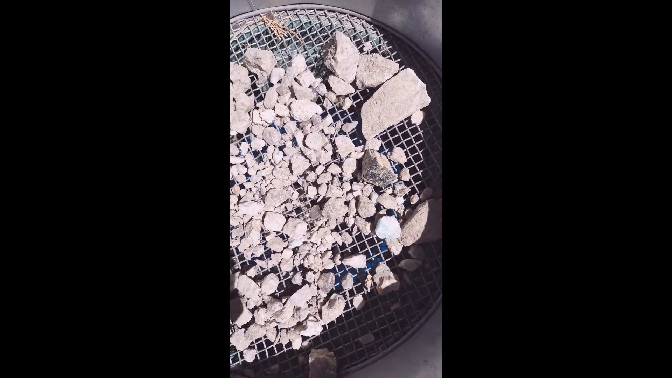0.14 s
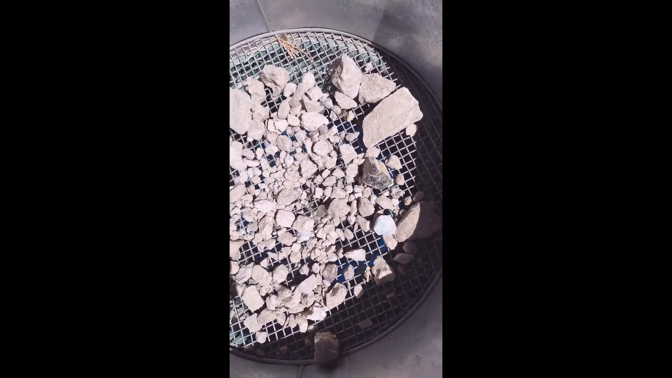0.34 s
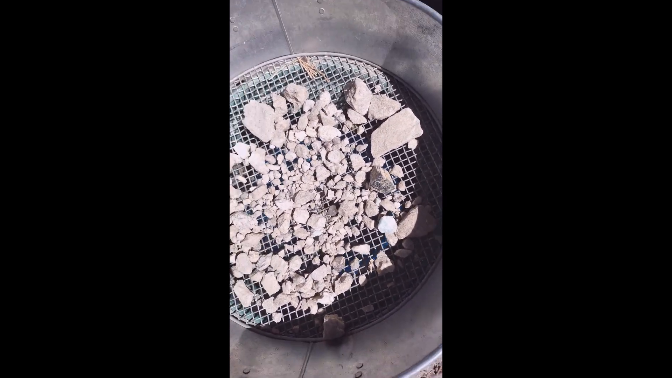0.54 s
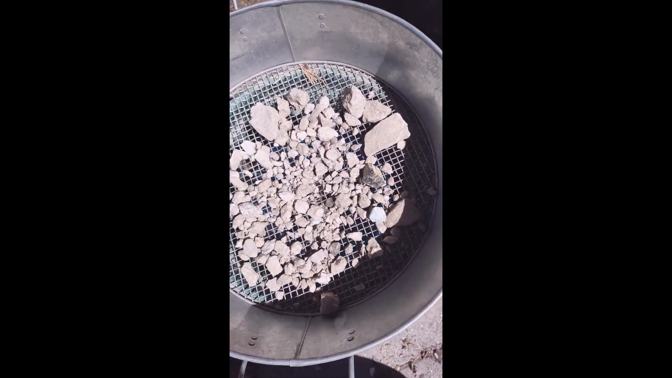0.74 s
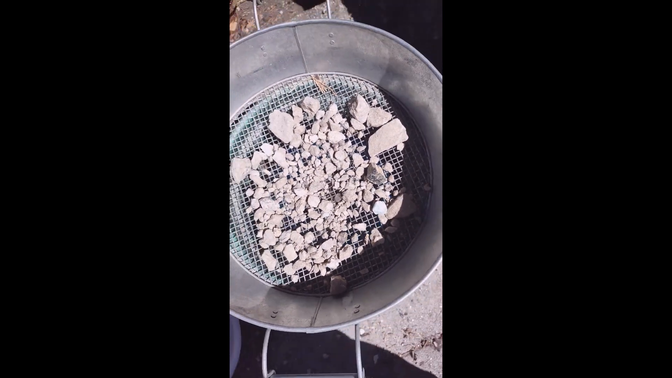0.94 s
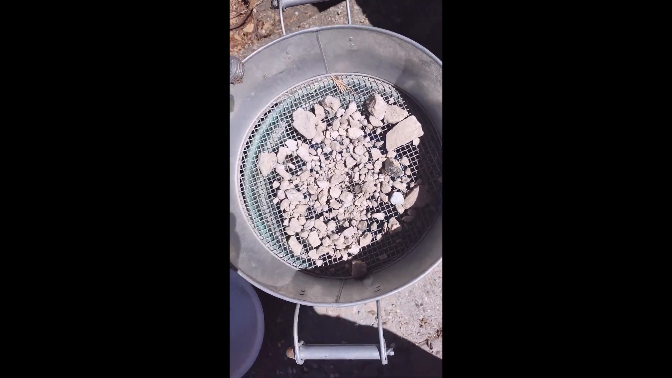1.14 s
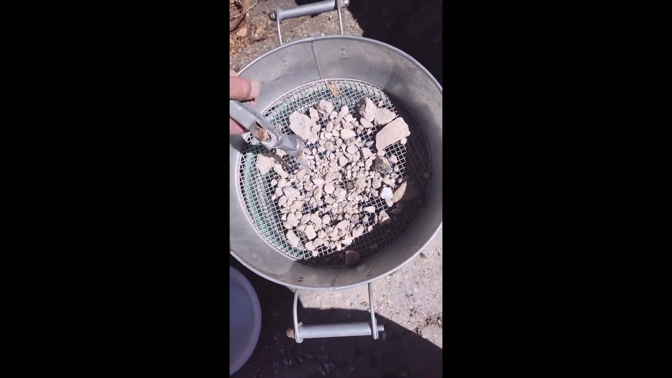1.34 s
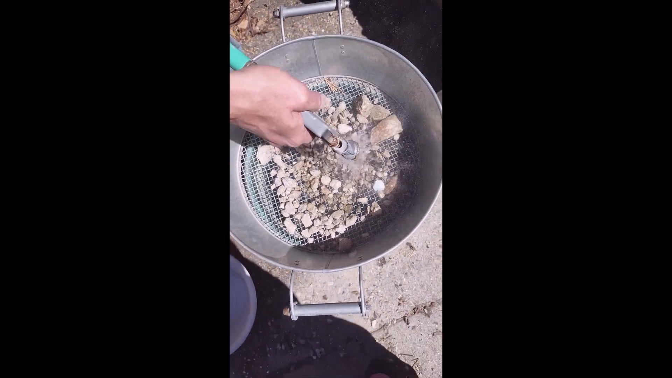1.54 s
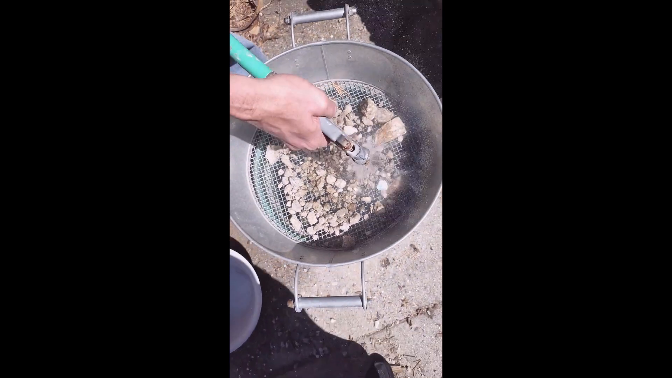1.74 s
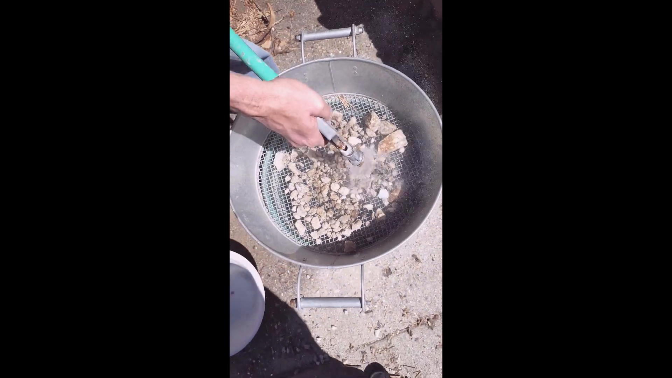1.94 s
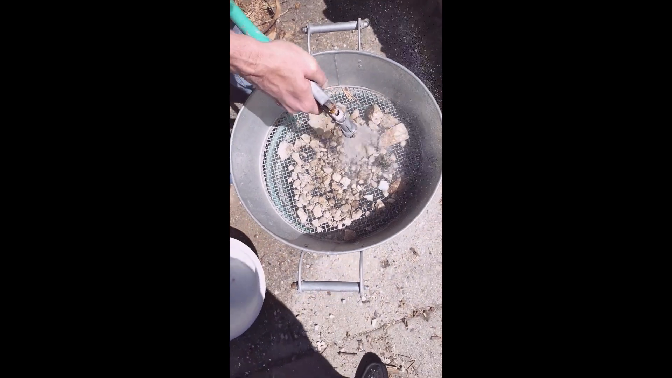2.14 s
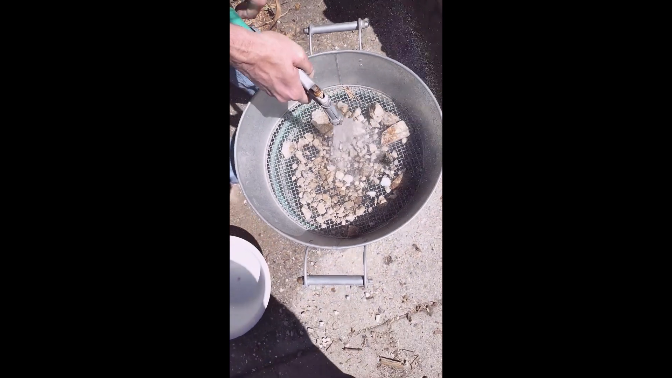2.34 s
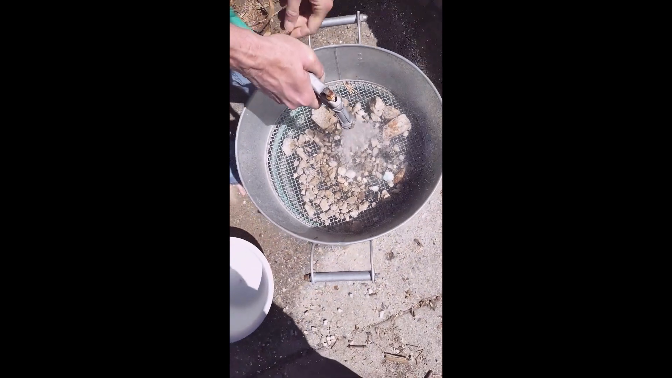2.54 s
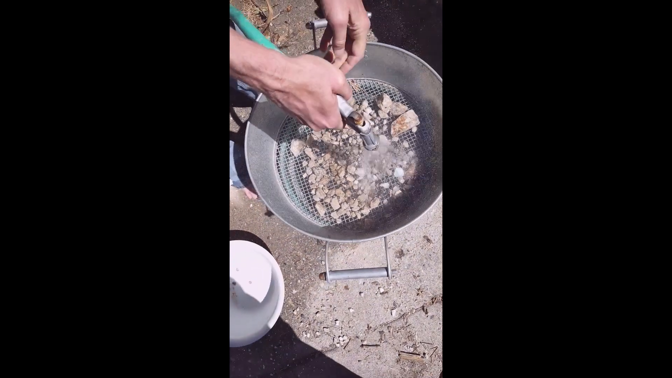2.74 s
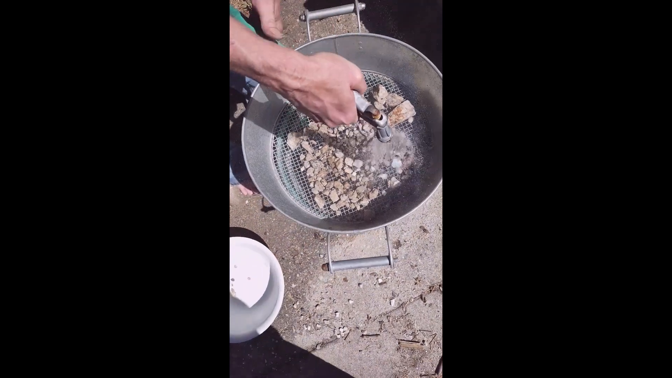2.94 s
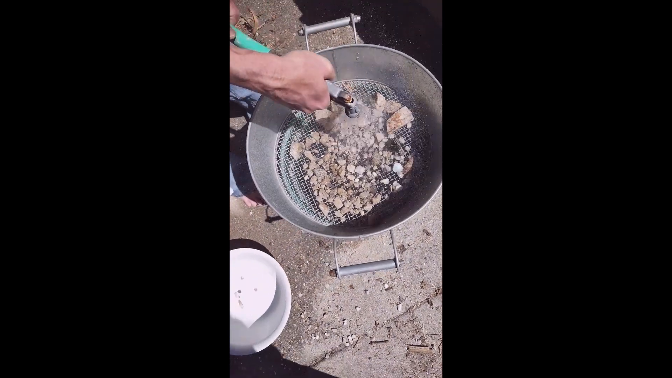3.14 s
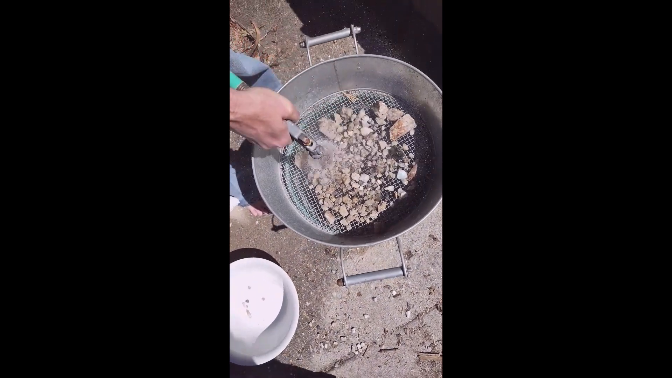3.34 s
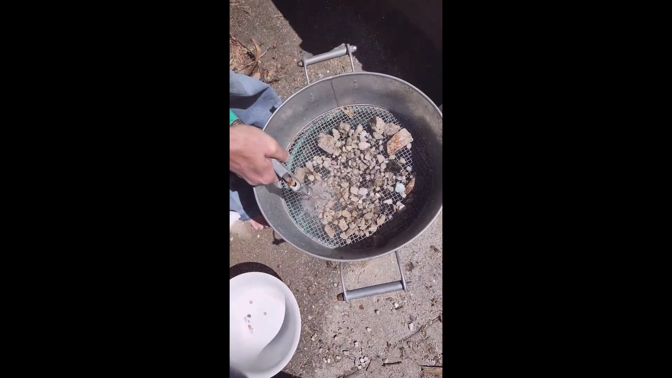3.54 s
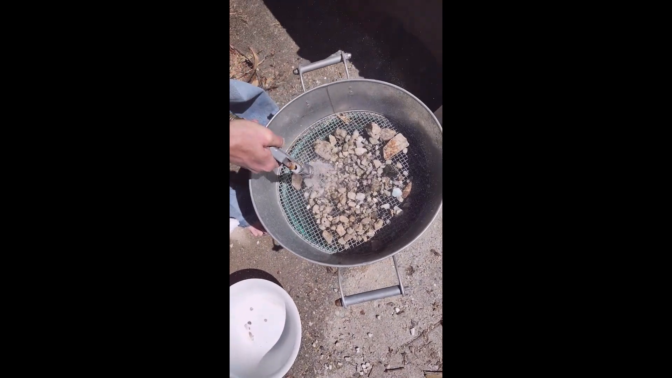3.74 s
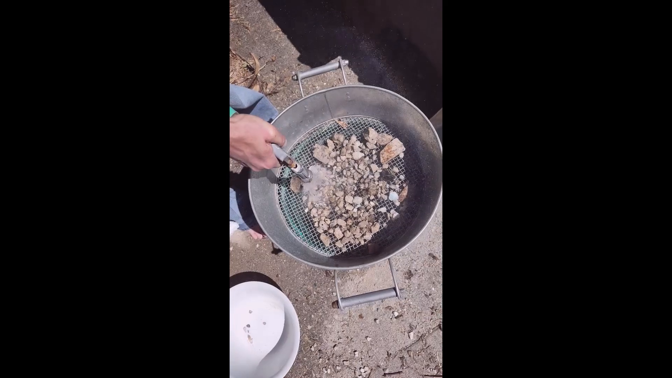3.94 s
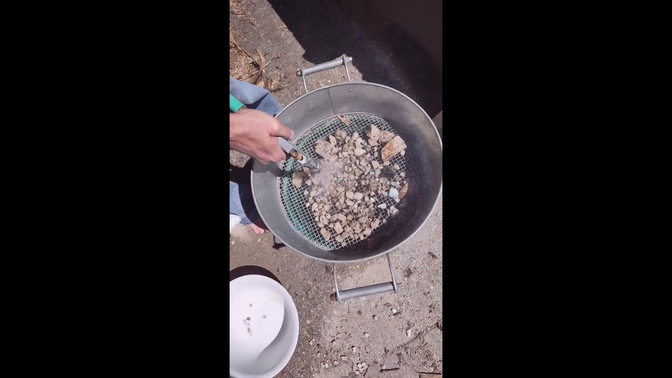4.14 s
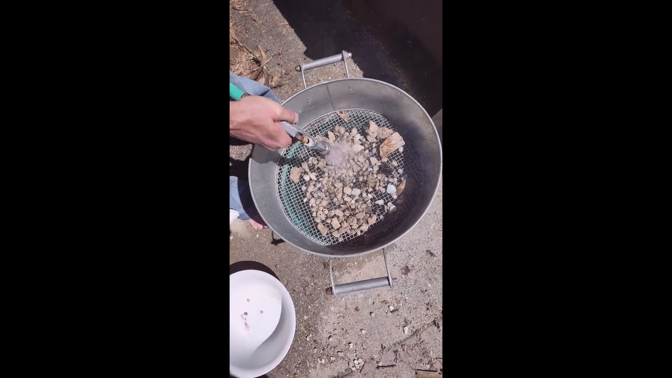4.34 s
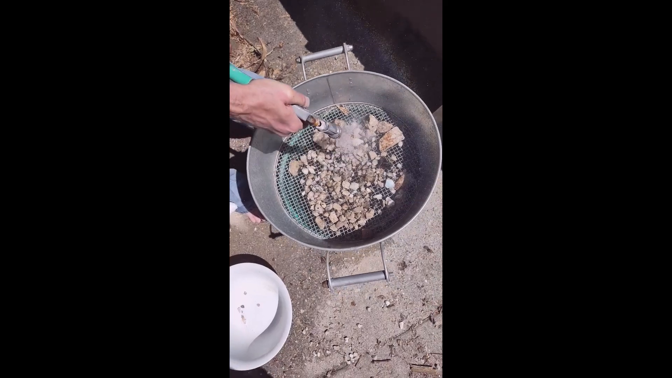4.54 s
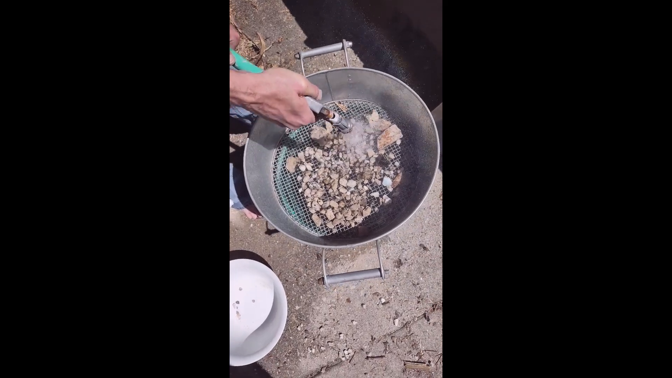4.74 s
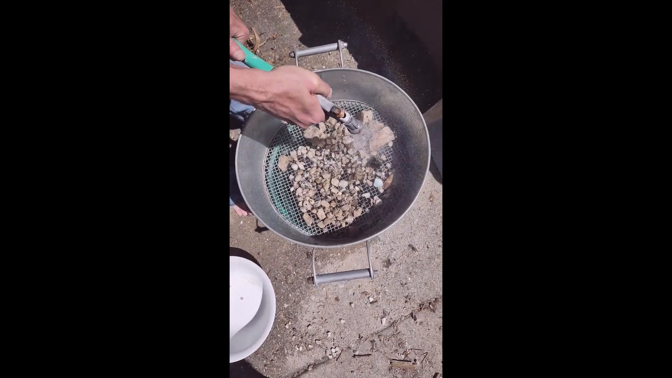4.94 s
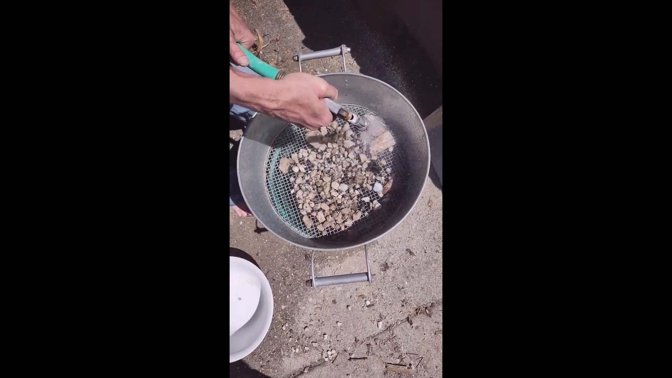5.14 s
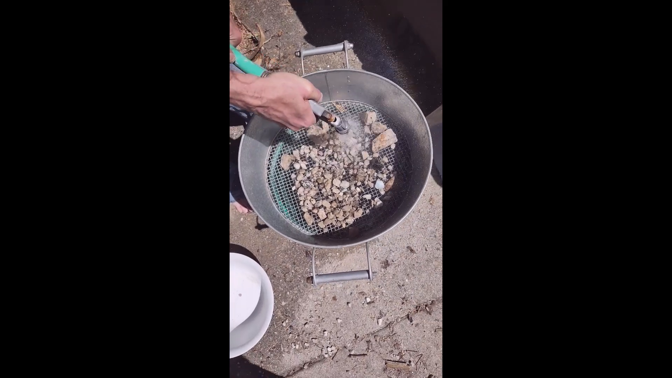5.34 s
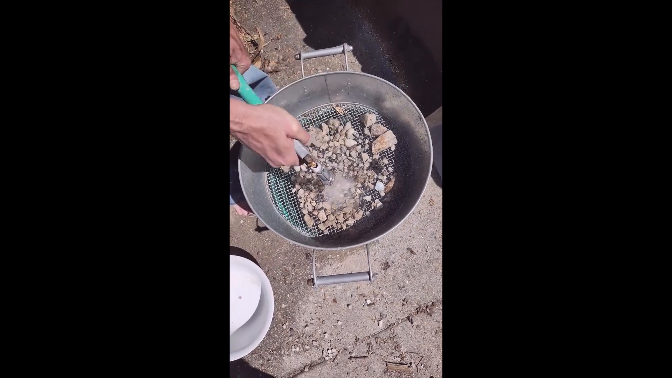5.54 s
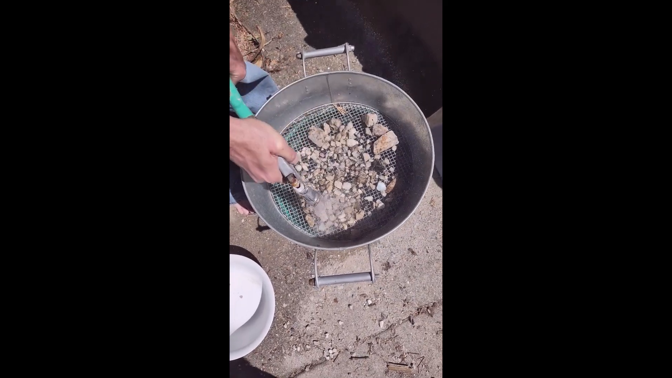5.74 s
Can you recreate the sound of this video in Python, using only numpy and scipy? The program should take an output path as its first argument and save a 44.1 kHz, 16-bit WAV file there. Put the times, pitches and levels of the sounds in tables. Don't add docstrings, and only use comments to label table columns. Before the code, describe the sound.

Faint motor drone and hose clicks, then a sudden bright water spray splashing over stones on a sieve, drumming and gurgling in a tub.

```python
import sys
import numpy as np
from scipy import signal
from scipy.fft import rfft, irfft, next_fast_len
from scipy.io import wavfile

SR = 44100
rng = np.random.default_rng(int(sys.argv[2]) if len(sys.argv) > 2 else 0)


def voltage_ratio(decibels):
    exponent = np.asarray(decibels, float) / 20
    return 10 ** exponent


def inscribe(sig):
    pcm = np.round(np.clip(np.atleast_2d(sig).T, -1, 1) * 32767)
    wavfile.write(sys.argv[1], SR, pcm.astype(np.int16))


N = 259308

# (frequency [Hz], level per Hz [dB])
YARD_COLOUR = [(18, -52), (30, -24), (48, -17), (68, -11), (97, -2.5), (117, -10), (130, -16), (156, -31),
               (192, -17), (225, -29), (256, -18), (481, -28.5), (1690, -35.5), (2630, -29), (15600, -45)]
# (frequency [Hz], width [Hz], level [dB])
DRONE_TONES = [
    (88, 7.7, -11),
    (105, 9, 0),
]
# (frequency [Hz], level per Hz [dB])
SCUFF_COLOUR = [(240, -32), (400, -1.5), (1790, -2.5), (2020, 0.5), (2220, 2.5), (4180, -4.5), (4650, -6),
                (6640, -13), (15300, -25), (16000, -31)]
# (time [s], peak [dB], rise [s], fall to -20 dB [s])
SCUFFS = [(.054, -68, .04, -0.1), (.3, -68, .03, 0.1), (.4, -66, .011, -0.15), (.774, -58, .015, -0.02),
          (.82, -49.5, .028, .075), (.938, -53, .035, 0), (.978, -61, 0.01, 0), (1.124, -62, .012, .025),
          (1.183, -54.5, 0.0077, -0.06), (1.284, -56, 0.059, 0.1), (1.309, -53, 0.019, 0.04),
          (1.368, -56, .018, .02), (1.389, -59, 0.012, 0.1)]
# (time [s], peak [dB], pitch [Hz], left minus right [dB])
GRIT_TICKS = [
    (0.016, -60, 3320, 5),
    (0.046, -52, 3220, 3),
    (0.184, -61, 3020, 2.1),
    (0.293, -49, 2760, 4.5),
    (0.398, -49.5, 3040, 1.1),
    (0.469, -56, 2570, 1.1),
    (0.564, -51, 3840, -1.5),
    (0.728, -57, 1970, -3),
    (0.753, -52, 3890, -4),
]
# (time [s], peak [dB], pitch [Hz], left minus right [dB])
HOSE_KNOCKS = [(0.772, -44, 600, -2), (0.775, -48, 4000, -4), (0.777, -44.5, 1780, -6),
               (0.805, -43, 4520, 2.1), (0.814, -40, 2330, -6), (0.83, -36.5, 3020, 0),
               (0.883, -53, 956, .1), (0.924, -47, 980, -3), (0.933, -38.5, 2000, 3), (0.949, -42, 1970, 3),
               (0.978, -49, 2870, -5), (0.994, -49, 2120, -2.5), (1.051, -51, 1990, 4),
               (1.12, -44, 2140, 5)]
# (time [s], peak [dB], pitch [Hz], left minus right [dB])
LEVER_CLICKS = [
    (1.078, -50.5, 4970, 1.6),
    (1.154, -40.5, 3250, -3),
    (1.182, -36.5, 2660, 1.5),
    (1.265, -52, 4200, 2),
    (1.28, -50, 2300, 7.5),
    (1.308, -46, 1500, 8),
    (1.364, -40, 4430, -4.8),
    (1.371, -39, 5730, 1.3),
    (1.387, -39, 5240, -1),
]
# (time [s], peak [dB], pitch [Hz])
PLOPS = [(1.691, -30, 680), (1.891, -21.5, 1120), (2.126, -16, 1250), (2.215, -25, 1230), (2.229, -25, 572),
         (2.307, -30, 1240), (2.589, -28, 814), (3.07, -16, 2000), (3.161, -28, 1000), (3.433, -19.5, 993),
         (3.536, -19, 1250), (3.869, -23, 1140), (4.088, -17.5, 1568), (4.488, -22, 1930),
         (4.56, -24.5, 1122), (4.825, -21.5, 893), (4.902, -19.5, 1180), (5.082, -18.5, 961),
         (5.212, -23, 1020), (5.778, -20, 1045), (5.86, -22, 955)]
# (time [s], peak [dB], pitch [Hz])
SLAPS = [(2.1235, -7.5, 3530), (2.218, -10, 3830), (2.353, -22, 2420), (2.4802, -7, 2600),
         (2.8554, -21, 2300), (3.298, -15, 2350), (3.6414, -10, 2540), (4.0908, -4.5, 2130),
         (4.1425, -4.5, 2240), (4.632, -7.5, 2620), (4.7426, -25, 4120), (5.6792, -10, 2550),
         (5.7786, -3.5, 2930)]
# (frequency [Hz], level per Hz [dB])
JET_COLOUR = [(3060, -19), (5200, -3), (7720, -1), (12600, -3), (17500, -2.0)]
SPLASH_COLOUR = [(1000, -19), (1700, -10.5), (2410, 0), (3120, -1), (4300, 0.5), (6000, -12.5), (7800, -22),
                 (13200, -120)]
DRUM_COLOUR = [(180, -39.5), (300, -9), (496, -1), (540, -3), (615, -1.5), (696, -2), (898, 1), (1090, 1),
               (1210, 1), (1680, -0.5), (1900, -7.5), (2470, -8), (4180, -120)]
BOOM_COLOUR = [(24, -61), (40, -26), (167, 1), (287, -3.5), (330, -8.5), (430, -55), (730, -120)]
# (frequency [Hz], width [Hz], level above the deep boom [dB])
TUB_MODES = [
    (170.4, 16, -7.5),
    (191.2, 29, -7.5),
    (607, 47, -4),
    (955, 150, -4),
]
# (time [s], jet [dB], spitting air [dB], arrival on the stones [dB])
VALVE = [
    (1.432, -40, -89, -45),
    (1.438, -13, -59.5, -22.5),
    (1.4505, -11, -50, -15.5),
    (1.4535, 1, -37, -10),
    (1.469, 6, -33, -10),
    (1.482, 3, -39, -6),
    (1.5, 1.5, -47, -4),
    (1.53, 0, -60, 0),
    (1.6, 1.3, -90, 1.1),
]
# (time [s], water striking stones [dB], nozzle facing microphone [dB], fineness of spray [dB per octave])
SPRAY_SWEEP = [(1.52, -5.5, -5, -1), (1.75, -2, -5, 0), (2.05, 1, -0.5, 1.2), (2.7, -0.5, -0.2, 0.7),
               (3.2, 0.5, 0.2, 0), (3.33, -0.5, 0, .1), (3.5, 0, -4.5, .4), (3.9, 0.7, -3, 2),
               (4.15, 0, -1.5, 1.5), (4.25, -0.5, -2, 0.5), (4.47, 1.5, 2, -1.5), (4.7, 1, 1, 0.3),
               (5.1, 1.5, -0.4, 0.5), (5.45, 0.5, 1, -1.2), (5.65, 0.6, -.8, 1), (5.88, 3, -1.2, 1.5)]
# (time [s], lift [dB], length [s])
GUSHES = [
    (1.74, 2.5, 0.082),
    (1.86, 2, .04),
    (3.2, 0, 0.045),
    (4.29, 1.5, 0.044),
    (4.66, 2, 0.039),
    (4.95, 2.5, 0.07),
    (5.1, 2.5, 0.064),
    (5.27, 3.5, 0.037),
    (5.44, 1.5, 0.096),
    (5.78, 0.5, .04),
]
# (time [s], lift [dB], length [s])
HOLLOW_FLARES = [(2.13, 9.5, .06), (2.36, 8, .025), (2.89, 12.5, 0.055), (3.54, 6, .03), (3.69, 12, 0.042),
                 (3.8, 2, .02), (4.09, -1, 0.022), (4.14, 13, 0.05), (4.45, 7, .07), (4.52, 8, .04),
                 (4.62, 7, .12), (4.82, 9.5, 0.09), (4.9, 4, 0.091), (5.13, 5, .06), (5.44, 11, 0.073),
                 (5.68, 8, 0.027), (5.86, 5, .08)]
# (frequency [Hz], likeness [0-1], left lead [radians])
MIC_PORTS = [(60, 1, 1.5), (148, 0.94, -0.66), (330, 0.7, 0), (515, 0.68, 0.42), (1170, 0.36, -1.45),
             (1600, 0, -0.1), (1730, 0.4, 0.5), (2300, 0.64, -0.9), (3010, 0.02, -3.5), (3530, 0.28, -3),
             (4700, 0.08, -5), (6750, 0.16, -7), (15800, 0.23, -18)]
# (frequency [Hz], left minus right [dB])
BODY_SHADING = [(60, -8), (92, 3), (140, -4), (210, 2), (330, -2), (500, 0.5), (770, 1.5), (1170, -5.5),
                (1790, -2), (2740, 6.5), (4190, 2), (6410, -0.5), (9810, -2), (15000, -10)]


def rms_one(x):
    return x / np.sqrt(np.mean(x ** 2) + 1e-20)


def in_time(rows):
    s, *columns = np.transpose(rows)
    return [np.interp(np.arange(N) / SR, s, column) for column in columns]


def at_hz(points, hz, axis=1):
    points = np.array(points)
    return np.interp(np.log(hz), np.log(points[:, 0]), points[:, axis])


def drift(rate):
    r = np.exp(-80 * np.pi * rate / SR)
    slow = signal.lfilter([1], [1, -2 * r, r * r], rng.standard_normal(N // 40 + 2002))[2000:]
    return np.interp(np.arange(N) / 40, np.arange(len(slow)), rms_one(slow))


def swells(events):
    t = np.arange(N) / SR
    lift_db = 0
    for s, db, length in events:
        lift_db = lift_db + db * np.interp(t, [s - 0.6 * length, s, s + length], [0, 1, 0])
    return lift_db


def drops(per_s, spread_db):
    size_db = spread_db * np.minimum(rng.exponential(1, (2, 2, N)), 5)
    sizes = voltage_ratio(size_db) * rng.standard_normal((2, 2, N))
    lands = rng.random((2, 2, N)) < per_s / SR
    return rms_one(sizes * lands + 1e-9)


def band_pass(order, low, high, x):
    return signal.sosfilt(signal.butter(order, [low, high], "band", fs=SR, output="sos"), x)


def to_sides(mid, side, hz):
    alike = np.clip(at_hz(MIC_PORTS, hz), 0, 1)
    return np.sqrt(1 + alike) * mid + np.sqrt(1 - alike) * side * [[1], [-1]]


def banded(trains, colour, tilt_db=0, surge_db=0, patchy_db=1.0, patch_rate=15):
    low_hz, high_hz = colour[0][0], min(colour[-1][0], .45 * SR)
    edges = np.geomspace(low_hz, high_hz, int(3 * np.log2(high_hz / low_hz)) + 2)
    out, power = 0, 0
    for k, (low, high) in enumerate(zip(edges, edges[1:])):
        mid, side = band_pass(2, low, high, trains[k % 2])
        hz = np.sqrt(low * high)
        colour_db = at_hz(colour, hz)
        tilt = tilt_db * np.log2(hz / np.sqrt(low_hz * high_hz))
        gain = voltage_ratio(tilt + surge_db + patchy_db * drift(patch_rate)) * voltage_ratio(colour_db)
        out = out + gain * to_sides(mid, side, hz)
        power += voltage_ratio(2 * colour_db) * (high - low) / SR * 4
    return out / np.sqrt(power)


def resonate(x, hz, width_hz):
    narrow = signal.butter(2, width_hz / 2, fs=SR, output="sos")
    turn = np.exp(2j * np.pi * np.cumsum(hz + np.zeros(N)) / SR)
    slow = signal.sosfilt(narrow, x[0] + 1j * x[1])
    mid, side = (slow * turn).real
    return rms_one(to_sides(mid, side, np.mean(hz)))


def ping(hz, t60, rise=0.):
    t = np.arange(int(t60 * SR)) / SR
    tone = np.sin(2 * np.pi * hz * t * (1 + rise * t / t60))
    return tone * voltage_ratio(-60 * t / t60) * (1 - np.exp(-t / 0.0011))


def add(out, s, sound):
    i = int(s * SR)
    out[:, i:i + sound.shape[-1]] += sound[..., :N - i]


def yard():
    white = rng.standard_normal((2, 2, N))
    air = voltage_ratio(-67.5 + 5) * banded(white, YARD_COLOUR, patchy_db=2.0, patch_rate=6.2)
    drone = 0
    for hz, width_hz, level_db in DRONE_TONES:
        drone = drone + voltage_ratio(level_db) * resonate(white[::-1], hz, width_hz)[0]
    fade_db = 9 * np.exp(-np.arange(N) / SR / .25)
    return air + voltage_ratio(-70 + 1.8 * drift(2.5) + fade_db) * drone


def scuffs():
    t = np.arange(N) / SR
    level = voltage_ratio(-89) + voltage_ratio(-70.5 + 2.5 * drift(25)) * (t > .76)
    for s, db, rise, fall in SCUFFS:
        level = level + voltage_ratio(db + np.interp(t, [s - 3 * rise, s, s + 3 * fall], [-60, 0, -60]))
    grains = drops(per_s=6000, spread_db=2.5)
    return level * banded(grains, SCUFF_COLOUR, tilt_db=0.69, patchy_db=2.5, patch_rate=41)


def ticks(events, treble_db):
    out, t = np.zeros((2, N)), np.arange(2000) / SR
    shape = voltage_ratio(-60 * t / .019) * (1 - np.exp(-t / 0.00092))
    for s, peak_db, hz, pan_db in events:
        noise = rng.standard_normal((2, 2, len(t))) * shape
        body = band_pass(2, hz * 0.7, hz * 1.46, 1.5 * noise[0] + noise[0, 0])
        body = body / np.abs(body).max()
        treble = 2.9 * voltage_ratio(treble_db) * band_pass(2, 5000, 13000, noise[1])
        crack = voltage_ratio(-12) * band_pass(1, 500, 5000, noise[1, ::-1] * shape)
        sides = voltage_ratio(peak_db + pan_db / 2 * np.array([[1], [-1]]))
        add(out, s, sides * (body + treble + crack))
        add(out, s, sides * voltage_ratio(-6) * ping(hz, t60=0.029))
    return out


def handling():
    grit = ticks(GRIT_TICKS, treble_db=-16)
    knocks = ticks(HOSE_KNOCKS, treble_db=-28)
    lever = ticks(LEVER_CLICKS, treble_db=-15)
    return scuffs() + grit + knocks + lever


def plops():
    out = np.zeros((2, N))
    for s, peak_db, hz in PLOPS:
        add(out, s, voltage_ratio(peak_db - 5) * ping(hz, 45 / hz, rise=0.017))
    fade = voltage_ratio(-60 * np.arange(600) / SR / 0.045)
    for s, peak_db, hz in SLAPS:
        burst = rng.standard_normal((2, 600)) * fade
        add(out, s, voltage_ratio(peak_db - 9.5) * band_pass(1, hz * 1.0, hz * 1.26, burst) * 2)
    return out


def bubbles(per_s, cycles):
    sizes = voltage_ratio(4.0 * np.minimum(rng.exponential(1, N), 4)) * rng.choice([-1, 1], N)
    born = (rng.random(N) < per_s / SR) * sizes
    born = born * voltage_ratio(rng.normal(0, 5.0, N) * [[1], [-1]])
    dealt, out = rng.integers(0, 16, N), 0
    for k, hz in enumerate(np.geomspace(550, 4500, 16)):
        r, w = voltage_ratio(-60 * hz / (cycles * SR)), 2 * np.pi * hz / SR
        mine = born * (dealt == k) + 1e-18
        ring = signal.lfilter([0, np.sin(w)], [1, -2 * r * np.cos(w), r * r], mine)
        out = out + ring * (hz / 1000) ** 1.22
    return rms_one(out)


def jet_hiss(fine, facing_db, fineness, gush_db, surge):
    tilt = fineness - 0.2 * gush_db
    hiss = banded(fine, JET_COLOUR, tilt, 0.67 * surge, patchy_db=0.85)
    return voltage_ratio(-33 + facing_db + 0.96 * gush_db + 2.0) * hiss


def wet_stones(fine, coarse, strike_db, gush_db, surge):
    splash_db = -33.5 + strike_db + gush_db
    hollow_db = -39 + 0.97 * strike_db + swells(HOLLOW_FLARES)
    tilt = .1 + 1 * gush_db
    splash = voltage_ratio(splash_db + 3.0) * banded(coarse, SPLASH_COLOUR, tilt, 0.16 * surge, patchy_db=0.5)
    hollow_hz = 2400 + 50.24 * drift(6)
    hollow = voltage_ratio(hollow_db - 6 + 3.5 * drift(6.5)) * resonate(fine[::-1], hollow_hz, width_hz=400)
    return splash + hollow + voltage_ratio(splash_db - 11.5) * bubbles(per_s=400, cycles=32)


def tub_drumming(fine, coarse, strike_db, gush_db, surge, since):
    drum_db = -40 + 0.56 * strike_db + 1.4 * gush_db
    full_tilt, empty_tilt, fill_s = .4, -2.5, 1.27
    tilt = full_tilt + (empty_tilt - full_tilt) * np.exp(-since / fill_s)
    tub = voltage_ratio(drum_db) * banded(coarse[::-1], DRUM_COLOUR, tilt, 0.78 * surge, patchy_db=1.5, patch_rate=18.4)
    late_db = -17 * np.exp(-since / 0.26)
    sinking_db = 0.78 * since
    boom_db = -48.5 + 0.46 * strike_db + late_db - sinking_db + 0.94 * drift(8.6)
    tub += voltage_ratio(boom_db + 0.5) * banded(fine, BOOM_COLOUR, patchy_db=1.8, patch_rate=5.5)
    for hz, width_hz, level_db in TUB_MODES:
        tub += voltage_ratio(boom_db + level_db) * resonate(coarse, hz, width_hz)
    return tub


def water():
    surge = drift(32.0)
    since = np.maximum(np.arange(N) / SR - VALVE[0][0], 0)
    opening_db, air_db, arrival_db = in_time(VALVE)
    strike_db, facing_db, fineness = in_time(SPRAY_SWEEP)
    gush_db = swells(GUSHES)
    fine, coarse = drops(per_s=15000, spread_db=1.0), drops(per_s=5000, spread_db=1.5)
    jet = voltage_ratio(opening_db) * jet_hiss(fine, facing_db, fineness, gush_db, surge)
    air = voltage_ratio(air_db) * resonate(coarse, 9000, width_hz=1600)
    stones = voltage_ratio(arrival_db) * wet_stones(fine, coarse, strike_db, gush_db, surge)
    tub = voltage_ratio(1.44 * arrival_db) * tub_drumming(fine, coarse, strike_db, gush_db, surge, since)
    flowing = since > 0
    return flowing * (jet + air + stones + tub)


def scene():
    return yard() + handling() + plops() + water()


def low_pass(x):
    return signal.sosfilt(signal.butter(12, 15750, fs=SR, output="sos"), x)


def record(dry):
    size = next_fast_len(N + 2048)
    hz = np.maximum(np.fft.rfftfreq(size, 1 / SR), 10)
    half = voltage_ratio(at_hz(BODY_SHADING, hz) / 2) * np.exp(.5j * at_hz(MIC_PORTS, hz, axis=2))
    low_cut = 1 / (1 + 57 / (1j * hz)) ** 2
    mix = irfft(rfft(dry, size) * [half, 1 / half] * low_cut, size)[:, :N]
    return low_pass(mix)


dry = scene()
out = record(dry)
inscribe(out)
```